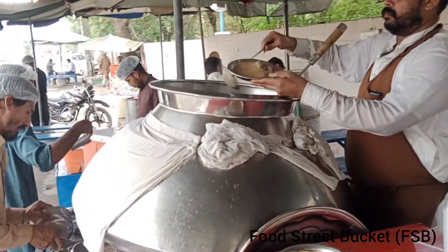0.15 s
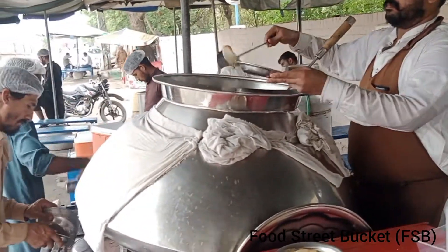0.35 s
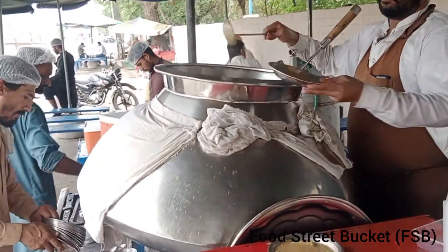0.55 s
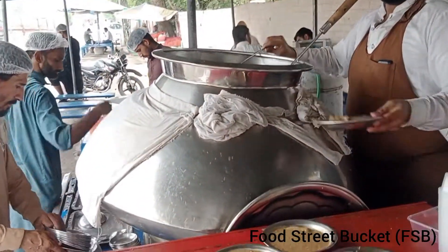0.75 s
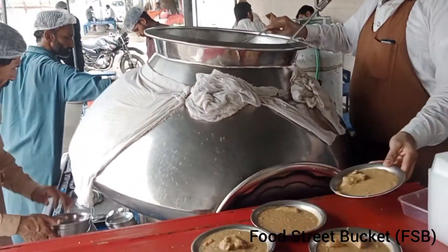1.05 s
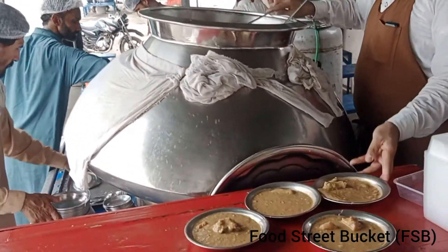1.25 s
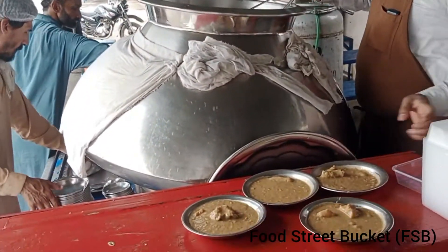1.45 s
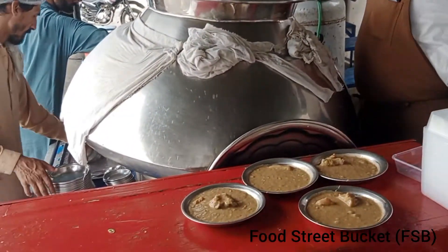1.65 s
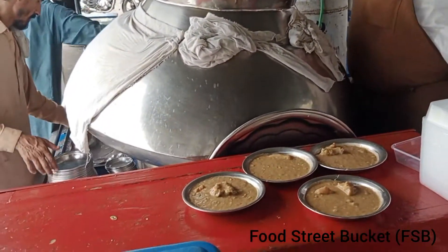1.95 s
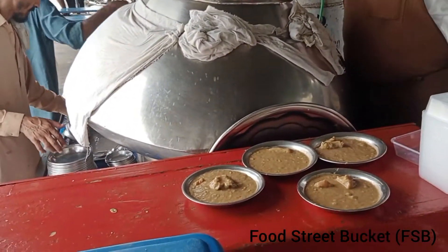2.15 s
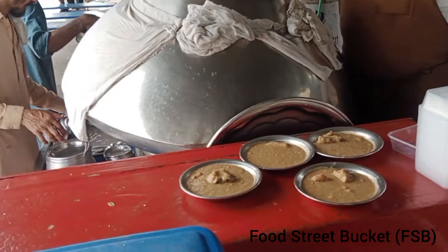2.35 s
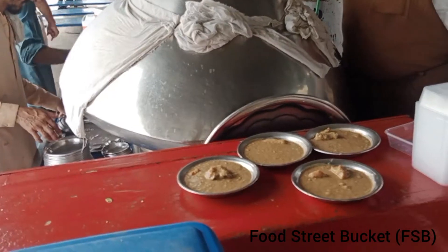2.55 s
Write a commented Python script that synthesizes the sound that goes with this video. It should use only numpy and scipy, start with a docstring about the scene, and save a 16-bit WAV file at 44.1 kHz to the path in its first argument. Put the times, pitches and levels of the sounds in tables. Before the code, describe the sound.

Stainless steel dishes clink and clatter at an outdoor food stall. Light plate clinks run from 0.1 to 0.4 s, then a loud stack clatter at 0.65-0.9. A plate thuds onto the counter around 1.25-1.3, followed by softer clinks and scraping. Stacking resumes from 1.9, with a bright bowl clink at 2.36. Low, uneven street rumble and a wavering engine drone lie underneath; small, noise-suppressed microphone.

```python
"""At a street food stall, steel plates and bowls clink, slide and are stacked; full ones knock the counter.
Each clink is a short noise clack, a dying clang of filtered noise and the clear tones of its dish.
Knocks are dull noise thuds with counter tones. Many tiny noise taps make the jostling and scraping around,
and patchy low noise with a wavering engine drone makes the street rumble.
A small microphone with a deep notch in the treble and a noise suppressor hears it all."""
import sys
import numpy as np
from scipy import signal
from scipy.fft import rfft, irfft
from scipy.io import wavfile
from scipy.ndimage import uniform_filter1d, map_coordinates

SR = 44100
rng = np.random.default_rng(int(sys.argv[2]) if len(sys.argv) > 2 else 0)


def wav_record(signal):
    """Record a signal, one row per channel, as 16-bit PCM in the file named by sys.argv[1]."""
    frames = np.transpose(np.atleast_2d(signal))
    bounded = np.clip(frames, -1, 1)
    # unit amplitude maps onto the largest positive 16-bit level
    quanta = np.round(bounded * 32767).astype(np.int16)
    wavfile.write(sys.argv[1], SR, quanta)


N = 119070
TIME = np.arange(N) / SR
RING_TIME = TIME[:SR]  # each clink or knock lasts at most one second

# In all tables, t60 is the time to lose 60 dB. Colours are relative: level sets the loudness.
# Steel meets steel: (time [s], level [dB], treble lift [dB], rise [s], clang [dB], ring [dB], dish [name])
CLINKS = [(0.091, -27.5, 14, 0.00095, -33, -5.5, "plate"), (0.219, -24, -1, 0.0015, -11.5, -6.5, "bowl"),
          (0.276, -21.5, -1, 0.0027, 1, -4, "plate"), (0.282, -24.5, 2, 0.00086, -1.5, -5, "plate"),
          (0.295, -27, 9, 0.0015, -1.5, -12.5, "plate"), (0.361, -26.5, 7, 0.0022, -21, -6, "plate"),
          (0.632, -20.5, 8, 0.003, -14, 1, "bowl"), (0.649, -21.5, -5, 0.002, -6.5, -2, "bowl"),
          (0.669, -13.5, 3, 0.0047, -13, -8, "stack"), (0.679, -14, -1.5, 0.00077, -12, -12.5, "stack"),
          (0.701, -32, -7, 0.0016, -5.5, 1, "stack"), (0.737, -31.5, 6, 0.0023, -7, 7, "stack"),
          (0.7792, -24.5, 14, 0.0061, 0, 8, "dish"), (0.861, -20, 4, 0.0051, -6, -6.5, "dish"),
          (0.98, -46.5, 28, 0.0003, -9, -3, "plate"), (0.992, -23, -28, 0.0054, -3, -14, "stack"),
          (1.314, -22.5, -0.5, 0.0011, -5.5, -2, "plate"), (1.343, -28, 0.5, 0.0019, 1.5, 0.5, "plate"),
          (1.490, -32.5, -3.5, 0.0049, 2.5, 2.5, "plate"), (1.615, -32, -13, 0.011, -0.5, 7.5, "plate"),
          (1.645, -30.5, 3, 0.0028, -5, -7, "plate"), (1.750, -31.5, -6.5, 0.0087, 2.5, -14, "plate"),
          (1.887, -54, 30, 0.001, -17, -8, "dish"), (1.928, -25.5, -3, 0.00088, -1, -18, "stack"),
          (1.958, -27, -1.5, 0.012, 1, -22, "stack"), (2.042, -31.5, -1.5, 0.0022, -3, -2, "stack"),
          (2.109, -26, -4, 0.0014, -4, -6, "stack"), (2.162, -29, -4.5, 0.0019, -3, -3, "bowl"),
          (2.260, -33, -6.5, 0.0053, 7.5, -7, "rim"), (2.294, -30.5, 6.5, 0.0067, -1.5, 11.5, "bowl"),
          (2.330, -22, 0.5, 0.012, 1, -13, "bowl"), (2.3617, -14.5, -3, 0.0006, -8, 1, "bowl"),
          (2.376, -23.5, -5, 0.00091, -11, -4, "bowl"), (2.478, -30.5, 6, 0.0025, -9, -1.5, "rim"),
          (2.520, -35, 0, 0.017, -1, 0.5, "rim")]
# Clear tones of each dish, by name: (pitch [Hz], level [dB], t60 [s])
DISH_TONES = { "plate": [(831, -4.5, 0.79), (877, -8, 1), (1198, 7.5, 0.48), (1547, 7.5, 0.15),
              (1695, -0.5, 0.41), (2060, -1.5, 0.32), (2430, 1.5, 0.19), (2602, 1, 0.17), (2830, 0.5, 0.16),
              (3330, -12, 0.25), (3550, -5, 0.26)], "stack": [(785, 2, 0.27), (870, -6, 0.2),
              (1116, 1, 0.56), (1202, -3.5, 0.31), (1305, 2, 0.31), (1467, 1, 0.15), (1565, -8, 0.55),
              (2430, -21, 0.5)], "dish": [(791, -2, 0.76), (974, 2, 1), (1078, 2, 0.57), (1380, -3, 0.56),
              (1637, -1, 0.26), (1796, 12, 0.13), (1905, -2, 0.63), (2487, 1, .3), (2815, -2, .3),
              (2996, 7, 0.24), (4090, 6, 0.33), (4340, 4, .22), (4570, 8, .18), (5920, -3, 0.28),
              (6589, -1, 0.24), (7030, -21, .34), (7795, -2, 0.23), (9700, 5, 0.17)],
              "bowl": [(985, -9, 0.25), (1093, -5, 1.0), (1246.8, 11, 0.22), (1405, -0.5, 0.32),
              (2138, -8, 0.39), (2653, -21, .35), (2875, -12, 0.33), (3060, -15, 0.4), (7480, -29, 0.9)],
              "rim": [(985, -1.5, 1.7), (1066, 1.5, 0.82), (1750, 3.5, 0.58), (2838, 2, 1.02),
              (3280, -9, 1.3), (7000, -13, 0.79)]}
# Colour of the crowd of higher modes in thin steel: (frequency [Hz], level [dB per Hz])
STEEL_COLOUR = [(40, -66), (150, -60), (300, -14), (480, -14), (660, -5), (800, -2), (1250, -1), (2000, -4),
                (3000, -9), (4200, -13.5), (7500, -17.5), (15000, -26)]
# How long those modes last: (frequency [Hz], t60 [s])
STEEL_T60 = [(400, 0.54), (1200, 0.35), (3000, 0.45), (7500, 0.33), (14000, 0.15)]
# Extra strength of the dense modes close to the clear tones, by dish name: lift [dB]
HALO_DB = {"plate": 4, "stack": 3, "dish": 9, "bowl": 7, "rim": 9}
# A dish lands on the counter: (time [s], level [dB], thin below [Hz], dull above [Hz])
KNOCKS = [(0.670, -18, 475, 1130), (1.2473, -13.5, 142, 1430), (1.2511, -17, 129, 1310),
          (1.2638, -21, 200, 730), (1.287, -17, 129, 242), (1.314, -13.5, 155, 259), (1.958, -24, 378, 775),
          (2.1099, -16.5, 550, 1100), (2.345, -24.5, 335, 750)]
# Tones of the counter: (pitch [Hz], level [dB], t60 [s])
COUNTER_TONES = [(147.8, -10, 0.16), (186.5, -4.5, 0.11), (237, -9.5, 0.18), (368, -10, 0.038),
                 (546.6, -8.5, 0.046), (845, -2, 0.029), (1080, -14, 0.031), (1355, -2.5, 0.045)]
# Dishes sliding and jostling all around: (time [s], level [dB])
JOSTLE_LEVEL = [(0, -28), (.19, -38), (.42, -36), (.6, -36.5), (.9, -34), (1.13, -35), (1.28, -33.5),
                (1.43, -33), (1.52, -30.5), (1.57, -32), (1.65, -29.5), (1.72, -32), (1.86, -31.5),
                (1.98, -33), (2.22, -32.5), (2.42, -28.5), (2.56, -32), (2.7, -33.5)]
# Their colour: (frequency [Hz], level [dB per Hz])
JOSTLE_COLOUR = [(100, -51), (300, -20), (650, -29), (840, -2), (1200, 1), (1800, -0.5), (2800, -7.5),
                 (3700, -19.5), (5600, -20), (7500, -19.5), (10000, -25), (15000, -51)]
# Hiss of rims scraping: (time [s], level [dB])
SCRAPE_LEVEL = [(0, -44.5), (.40, -45.5), (.46, -46), (.6, -43), (1.08, -42.5), (1.14, -72), (1.28, -57),
                (1.33, -39), (1.42, -48), (1.47, -41), (1.56, -43), (1.61, -39), (1.72, -45), (1.86, -49),
                (1.96, -42.5), (2.22, -46.5), (2.35, -44), (2.56, -47.5), (2.62, -57)]
# Its colour: (frequency [Hz], level [dB per Hz])
SCRAPE_COLOUR = [(500, -12), (2500, -5), (4000, 3), (7500, 3), (10000, 3.5), (15000, 0.5)]
# Main street rumble: (time [s], level [dB])
RUMBLE_LEVEL = [(0, -37.5), (.3, -35), (.56, -37.5), (.66, -32.5), (.85, -29.5), (1.07, -40), (1.22, -28.5),
                (1.45, -38), (1.68, -25.5), (1.9, -29), (2.1, -29.5), (2.35, -24.5), (2.52, -41),
                (2.7, -30.5)]
# Its colour: (frequency [Hz], level [dB per Hz])
RUMBLE_COLOUR = [(25, -34), (45, -39), (62, -29.5), (100, -6.5), (130, -2.5), (165, 1), (205, -3.5),
                 (255, -18.5), (335, -21.5), (410, -41.5), (600, -28.5), (1500, -61)]
# Low middle of the rumble: (time [s], level [dB])
LOW_MIDDLE_LEVEL = [(0, -44.5), (.33, -38), (.53, -36), (.59, -66), (.75, -35), (1.15, -45.5), (1.4, -38),
                    (1.52, -64), (1.62, -39), (1.8, -35.5), (1.9, -52), (2.1, -39), (2.36, -33.5),
                    (2.7, -46.5)]
# Its colour: (frequency [Hz], level [dB per Hz])
LOW_MIDDLE_COLOUR = [(100, -30), (200, -18), (260, 0.5), (340, 2.5), (375, -2.5), (420, -13), (650, -25.5),
                     (1500, -31)]
# Deep bass of the rumble: (time [s], level [dB])
DEEP_LEVEL = [(0, -58), (.7, -49), (.82, -27.5), (.92, -49), (1.0, -53), (1.42, -73), (1.5, -37),
              (1.57, -70), (1.98, -42), (2.12, -38), (2.22, -54), (2.39, -37), (2.5, -50)]
# Its colour: (frequency [Hz], level [dB per Hz])
DEEP_COLOUR = [(20, -18), (45, -15), (65, 6), (90, 9), (140, -26), (400, -51)]
# Engine drone in the street: (time [s], level [dB])
DRONE_LEVEL = [(0, -38), (.5, -51), (.68, -29), (.85, -36.5), (1.1, -38), (1.55, -44.5), (1.8, -44),
               (2.05, -54), (2.4, -48), (2.7, -34)]
# Microphone colour: (frequency [Hz], gain [dB])
MIC_COLOUR = [(3000, -1), (3600, -3.5), (4200, -6.5), (4550, -14.5), (4850, -27), (5200, -15.5),
              (5600, -9.5), (6200, -6), (6800, 1.5), (7700, 4.5), (8600, 1.5), (9300, -7), (11000, -3),
              (13000, -2), (14300, -3), (15500, 0)]

CLACK_T60_S, CLACK_DB, CLANG_DB = 0.12, -6, 1.5
TREBLE_FROM_HZ, TREBLE_TO_HZ = 1860, 8200
CLUSTER_HZ, CLUSTER_DB = 70.24, 5  # the dense modes bunch into uneven clusters
HALO_SHARE = 0.013  # halfwidth of the halo around each clear tone, as a share of its pitch
BEAT_HZ, BEAT_SHARE = 7.9, 0.0058  # spread of close neighbours: fixed part, and share of the pitch
BEAT_DEPTH = 0.65  # strength of the neighbours against the tone itself
THUD_T60_S, THUD_DB = 0.044, -1.5
THUD_TAIL_T60_S, THUD_TAIL_DB = 0.57, -10.5
PUSH_DB = 22.5  # the single shove at the moment of contact, before filtering
TAPS_PER_S, TAP_LAYERS, TAP_SPREAD_DB, TAP_T60_S = 500, 8, 3.5, 0.061
WASH_SHARE = 0.73  # share of the jostling's power that is a wash of steady noise
PATCH_HZ, PATCH_S, PATCH_DB = 123.3, 0.06, 2
DRONE_HZ, DRONE_WAVER, DRONE_OCTAVE_DB = 161.9, 0.02586, -10.5  # waver: rms share of the pitch
QUIET_DB, QUIET_SLOPE, QUIET_FLOOR_DB = -83.5, 0.88, -23  # threshold per Hz, dB lost per dB below, deepest cut
EDGE_HZ = 15725  # upper limit of what is heard


def clink(start, db, treble_db, rise, clang_db, ring_db, dish):
    """Rims meet: a short clack, a clang of dense modes, and the dish's own clear tones."""
    t = RING_TIME
    shape = steel(np.fft.rfftfreq(SR, 1 / SR), treble_db, dish)
    clack, clang = irfft(rfft(rng.standard_normal((2, SR))) * shape, SR)
    clack = clack * fade(np.maximum(t - rise, 0), CLACK_T60_S)

    # Each band of the clang dies away at its own speed
    hz, band_time, bands = signal.stft(clang, SR, nperseg=256)
    dying = bands * fade(band_time, read(STEEL_T60, hz)[:, None])
    clang = signal.istft(dying, SR, nperseg=256)[1][:SR]

    tones = ring(DISH_TONES[dish], BEAT_DEPTH)
    sound = amp(CLACK_DB) * clack + amp(CLANG_DB + clang_db) * clang + amp(ring_db) * tones
    return start, amp(db) * np.minimum(t / rise, 1) * sound


def steel(hz, treble_db, dish):
    """Spectrum of a dish's dense modes: uneven clusters, lifted around its clear tones."""
    bumps = rng.standard_normal(2048)
    clusters = np.interp(hz / CLUSTER_HZ, np.arange(len(bumps)), bumps)
    halos = [np.exp(-((hz / tone_hz - 1) / HALO_SHARE) ** 2) for tone_hz, _, _ in DISH_TONES[dish]]
    halo = np.max(halos, axis=0)
    shape = amp(read(STEEL_COLOUR, hz) + CLUSTER_DB * clusters + HALO_DB[dish] * halo)
    return unit(shape) * amp(treble_db * treble(hz))


def treble(hz):
    """0 in the middle range, rising to 1 in the treble."""
    return read([(TREBLE_FROM_HZ, 0), (TREBLE_TO_HZ, 1)], hz)


def ring(modes, depth):
    """Dying tones that start near rms 1 and beat against their close neighbours."""
    t, sound = RING_TIME, 0
    for hz, db, t60 in modes:
        # Three neighbours; high tones spread wider, so they beat faster
        offsets = rng.uniform(-1.106, 1, (3, 1)) * (BEAT_HZ + BEAT_SHARE * hz)
        turns = rng.random((4, 1))  # random starting points in the cycle
        neighbours = np.sin(2 * np.pi * ((hz + offsets) * t + turns[1:])).sum(0) / np.sqrt(3)
        tone = np.sin(2 * np.pi * (hz * t + turns[0]))
        sound = sound + amp(db) * fade(t, t60) * (tone + depth * neighbours)
    power = (1 + depth ** 2) * sum(amp(db) ** 2 for _, db, _ in modes) / 2
    return sound / np.sqrt(power)


def knock(start, db, thin_hz, dull_hz):
    """A dish shoves the counter, which thuds and rings; softer contacts excite only the low modes."""
    t = RING_TIME
    soft = signal.butter(3, dull_hz, fs=SR, output="sos")
    thin = signal.butter(3, thin_hz, "high", fs=SR, output="sos")
    thud_fade = amp(THUD_DB) * fade(t, THUD_T60_S) + amp(THUD_TAIL_DB) * fade(t, THUD_TAIL_T60_S)
    thud = unit(signal.sosfilt(soft, rng.standard_normal(SR))) * thud_fade
    board = amp(PUSH_DB) * (t == 0)
    for hz, mode_db, t60 in COUNTER_TONES:
        board = board + amp(mode_db) * fade(t, t60) * np.sin(2 * np.pi * hz * t)
    sound = signal.sosfilt(thin, thud - board)
    return start, amp(db) * signal.sosfilt(soft, sound)


def jostle():
    """Many small touches of steel, blurred into a wash by distance, and the hiss of rims scraping."""
    taps = np.zeros(N)
    tap_time = RING_TIME[:SR // 8]
    for _ in range(TAP_LAYERS):  # every layer repeats its own tap sound
        size = amp(TAP_SPREAD_DB * np.minimum(rng.exponential(1, N), 4))
        hits = size * (rng.random(N) < TAPS_PER_S / TAP_LAYERS / SR)
        tap = rng.standard_normal(len(tap_time)) * fade(tap_time, TAP_T60_S)
        taps += signal.oaconvolve(hits, tap)[:N]
    wash = rng.standard_normal(N)
    touches = patchy(np.sqrt(1 - WASH_SHARE) * unit(taps) + np.sqrt(WASH_SHARE) * wash)
    scraping = patchy(taps[::-1])  # the same taps, backwards in time
    touches = level(JOSTLE_LEVEL) * unit(colour(touches, JOSTLE_COLOUR))
    return touches + level(SCRAPE_LEVEL) * unit(colour(scraping, SCRAPE_COLOUR))


def street():
    """Traffic rumble in three registers of noise, with one wavering engine drone and its octave."""
    drift = unit(colour(rng.standard_normal(N), [(8, 0), (40, -40), (200, -120)]))  # slow wandering
    phase = 2 * np.pi * np.cumsum(DRONE_HZ * (1 + DRONE_WAVER * drift)) / SR
    drone = unit(np.sin(phase) + amp(DRONE_OCTAVE_DB) * np.sin(2 * phase))
    sound = level(DRONE_LEVEL) * drone
    registers = [(DEEP_LEVEL, DEEP_COLOUR), (RUMBLE_LEVEL, RUMBLE_COLOUR),
                 (LOW_MIDDLE_LEVEL, LOW_MIDDLE_COLOUR)]
    for curve, shape in registers:
        sound = sound + level(curve) * unit(colour(patchy(rng.standard_normal(N)), shape))
    return sound


def patchy(x):
    """Lets narrow bands swell and sink on their own, following a smooth random map."""
    hz, t, bands = signal.stft(x, SR, nperseg=1024, noverlap=768)
    places = np.meshgrid(hz / PATCH_HZ, t / PATCH_S, indexing="ij")
    patches = map_coordinates(rng.standard_normal((512, 256)), places, order=1, mode="wrap")
    swelling = bands * amp(PATCH_DB * unit(patches))
    return signal.istft(swelling, SR, nperseg=1024, noverlap=768)[1][:N]


def suppress(x):
    """Noise suppressor: bands that fall below a threshold are turned down further."""
    bands = signal.stft(x, SR, nperseg=512, scaling="psd")[2]
    power = uniform_filter1d(abs(bands) ** 2, size=3, axis=0)  # smooth over frequency
    power = uniform_filter1d(power, size=5, axis=1)  # then over time
    power_db = 10 * np.log10(abs(power) + 1e-20)
    cut_db = np.clip(QUIET_SLOPE * (power_db - QUIET_DB), QUIET_FLOOR_DB, 0)
    return signal.istft(bands * amp(cut_db), SR, nperseg=512, scaling="psd")[1][:N]


def amp(db):
    """Turns decibels into gain."""
    return 10 ** (np.asarray(db) / 20)


def unit(x):
    """Scales to rms 1."""
    return x / np.sqrt(np.mean(x ** 2) + 1e-20)


def read(points, hz):
    """Reads between the rows of a table on a log-frequency axis."""
    f, value = np.transpose(points)
    return np.interp(np.log(hz + 1), np.log(f + 1), value)


def level(points):
    """Gain over time from rows of (time [s], level [dB])."""
    return amp(np.interp(TIME, *np.transpose(points)))


def fade(t, t60):
    """Exponential decay that loses 60 dB in t60 seconds."""
    return np.exp(-np.log(1000) * t / t60)


def colour(x, points):
    """Filters by a table of (frequency [Hz], gain [dB])."""
    gain = amp(read(points, np.fft.rfftfreq(len(x), 1 / SR)))
    return irfft(rfft(x) * gain, len(x))


def add(mix, start, sound):
    """Mixes a sound in at its start time in seconds, cut off at the end of the scene."""
    part = mix[round(start * SR):][:len(sound)]
    part += sound[:len(part)]


def scene():
    """Clinks and knocks over the background dishes and the street."""
    mix = street() + jostle()
    for row in KNOCKS:
        add(mix, *knock(*row))
    for row in CLINKS:
        add(mix, *clink(*row))
    return mix[None]


def record(dry):
    """Microphone colour, noise suppressor, then the band limit."""
    padded = np.pad(dry[0], (0, SR // 10))  # room at the end, so the filter does not wrap around
    heard = suppress(colour(padded, MIC_COLOUR))
    band_limit = signal.firwin(511, EDGE_HZ, window=("kaiser", 9), fs=SR)
    return signal.oaconvolve(heard, band_limit, "same")[None]


dry = scene()
out = record(dry)
wav_record(out)
```